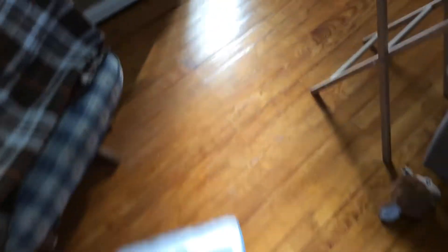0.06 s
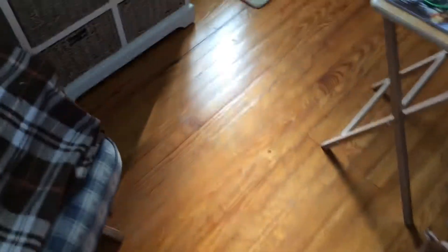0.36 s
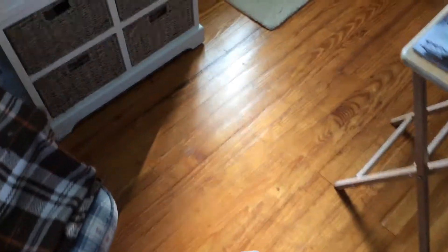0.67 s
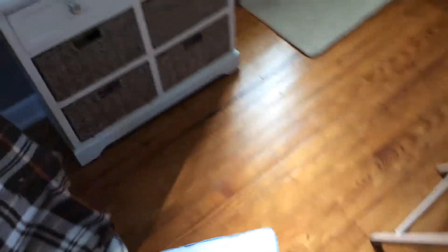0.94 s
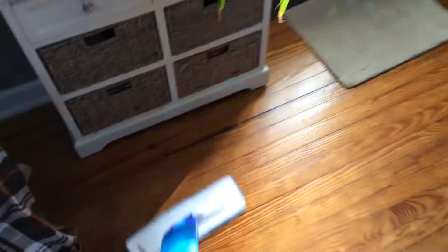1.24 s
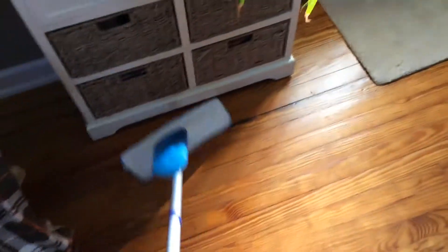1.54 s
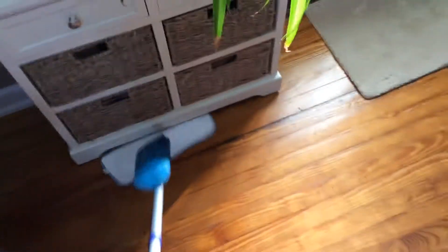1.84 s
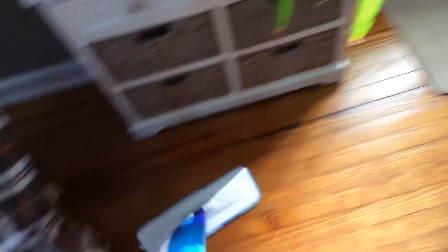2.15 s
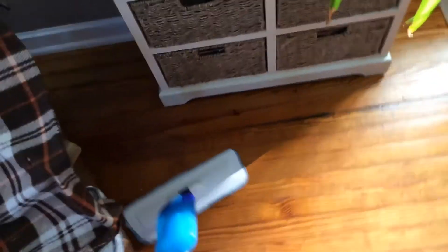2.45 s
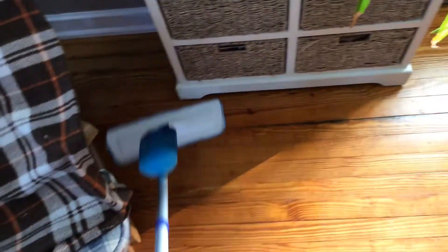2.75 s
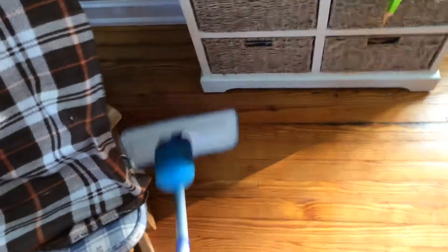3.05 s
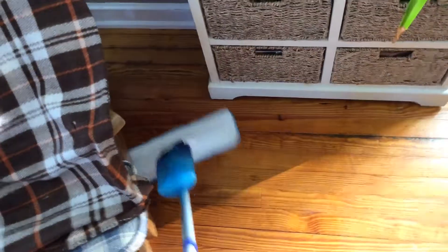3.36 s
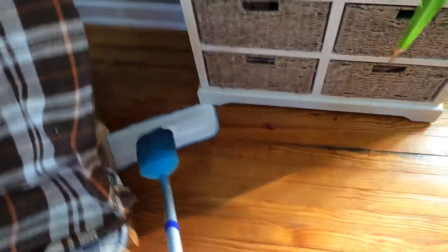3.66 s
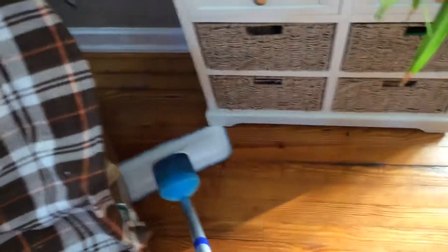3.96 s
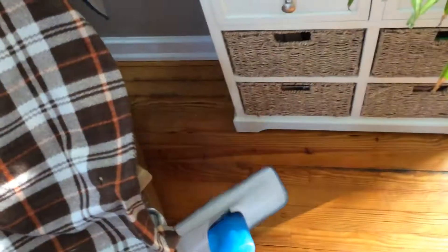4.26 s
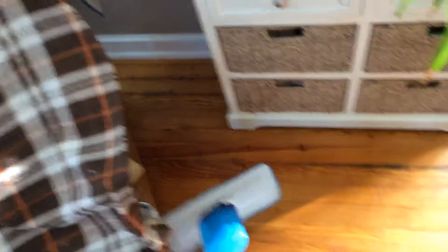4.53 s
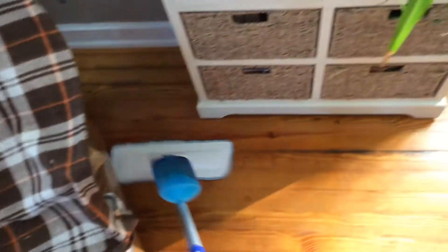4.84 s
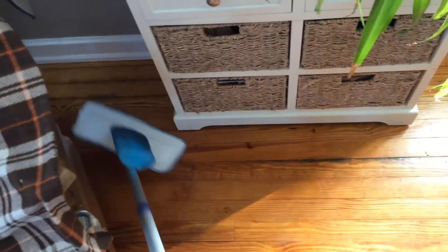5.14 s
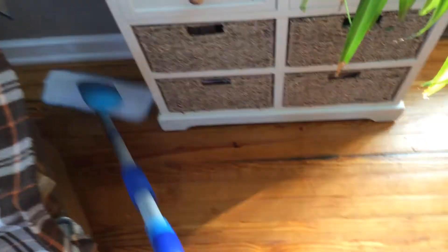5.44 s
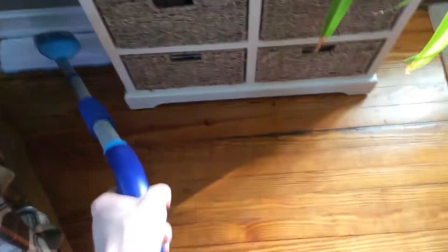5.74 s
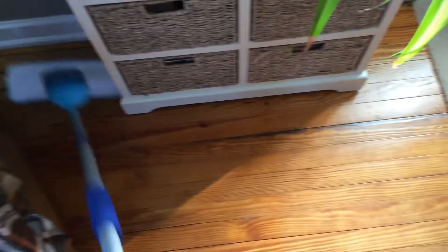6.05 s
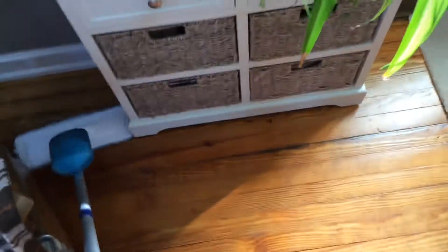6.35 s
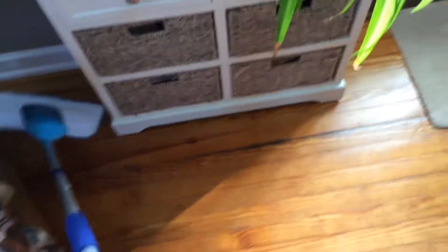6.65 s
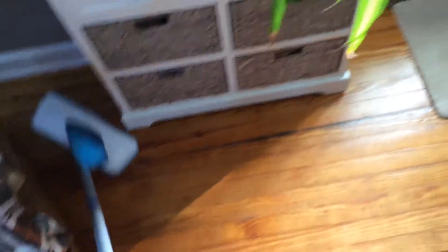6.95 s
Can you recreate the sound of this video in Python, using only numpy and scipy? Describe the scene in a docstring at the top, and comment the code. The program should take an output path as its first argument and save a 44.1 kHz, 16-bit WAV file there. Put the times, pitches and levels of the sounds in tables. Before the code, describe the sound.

Light clicks from a mop's swivel joint and soft cloth swishes, with a hollow wooden thump and later a sharp plastic clack.

```python
"""A flat plastic mop is pushed over a wooden floor in a small furnished room.
Its cloth pad swishes faintly and its swivel joint clicks. The head thuds softly on the floor, then at
1.7 s thumps a cabinet, whose panels boom while the joint rattles. The pad scuffs and the head's hard
edge clacks against furniture, loudest at 3.5 s. Clicks and tiny creaks of slipping parts lead to another
floor thud and rattle at 6.2 s. A low room rumble with a faint hiss and hum lies under it all."""
import sys
import numpy as np
from scipy import signal
from scipy.fft import rfft, irfft, next_fast_len
from scipy.io import wavfile
from scipy.ndimage import map_coordinates

SR = 44100
rng = np.random.default_rng(int(sys.argv[2]) if len(sys.argv) > 2 else 0)


def materialize(psi):
    """Save the field psi as 16-bit PCM at rate SR to the path in sys.argv[1].

    A 1-D psi becomes a single channel; in a 2-D psi each row is a channel.
    """
    bounded = np.clip(np.atleast_2d(psi).T, -1, 1)
    quanta = np.round(bounded * 32767).astype(np.int16)
    wavfile.write(sys.argv[1], SR, quanta)


N = 308700  # 7 s
HIT_TIME = np.arange(SR // 2) / SR  # time axis of one hit [s]
HIT_HZ = np.fft.rfftfreq(2 * len(HIT_TIME), 1 / SR)  # frequency axis of its EQ curves
LEAD_S, TICK_S = 0.03, 0.0021  # lead-in before each blow; contact time of a small part

# the head hits wood: (time [s], level [dB], crack send [dB], low boost [dB], ring send [dB], contact [s])
BUMP_CUES = [(1.22, -43.5, -17.5, 13.5, -17, 0.017), (1.736, -8, -13.5, -8, -3, 0.011),
             (1.795, -24, -20, 3, -8.5, 0.0093), (6.193, -34, -18.5, 10.5, -9.5, 0.0099)]
# the cabinet's panel modes: (frequency [Hz], level [dB], decay by 60 dB [s])
CABINET_MODES = [(78.2, -20, 0.26), (131, -9.5, 0.17), (167, -10.5, 0.19), (206, 1.5, .19),
                 (245.4, -12.5, 0.11), (322, -6, 0.29), (367, -4, 0.19), (415, -2.5, 0.19),
                 (558.4, -13.5, 0.3), (568.5, -12, 0.2), (759, -17.5, .2)]
# the dull body of a bump: (frequency [Hz], level [dB])
THUD_EQ = [(25, -55), (50, -25.5), (78, -9), (100, -7.5), (130, -6.5), (195, 2.5), (270, -1), (360, -2.5),
           (440, -6), (600, -11.5), (900, -27), (1300, -22.5), (2600, -66.5)]
# the attack at the head's edge: (frequency [Hz], level [dB])
CRACK_EQ = [(410, -10), (700, -4), (1030, -0.5), (1170, -9), (1440, -6.5), (1550, -7), (1720, -9.5),
            (8110, -25), (15000, -43)]


def wood_bumps(ring_db=-3, thud_db=-8, crack_db=-1, boost_hz=130, swell_cycles=1.2):
    """The mop head thuds on the floor or against the cabinet: its edge cracks and the wood booms."""
    out = np.zeros(N)
    for start, db, edge_db, low_db, panel_db, contact_s in BUMP_CUES:
        ring = np.zeros(len(HIT_TIME))
        for hz, mode_db, t60 in CABINET_MODES:
            swell = 1 - np.exp(-HIT_TIME * hz / swell_cycles)  # low modes take longer
            ring += swell * ringing_mode(hz, mode_db + rng.normal(0, 1), t60)
        weight = eq_curve(THUD_EQ) * (1 + amp(low_db) * low_pass(boost_hz))
        body_blow = contact(contact_s, room_db=1, rise_s=0.00031, scrape_db=-48)
        edge_blow = contact(contact_s / 2, room_db=4, rise_s=0.00053, scrape_db=-35.5)
        thud = amp(thud_db) * apply_eq(body_blow, weight)
        crack = amp(crack_db + edge_db) * apply_eq(edge_blow, eq_curve(CRACK_EQ))
        add(out, start, amp(db + ring_db + panel_db) * ring)
        add(out, start - LEAD_S, amp(db) * (thud + crack))
    return out


# the hard edge strikes: (time [s], level [dB], treble [dB], bass [dB], room send [dB], contact [s])
CLACK_CUES = [(2.9172, -32, -33.5, -6.5, -8, 0.0035), (2.925, -37, -21, 6, -3, 0.0027),
              (3.488, -47, -18.5, -7.5, -3, 0.004), (3.499, -12, -10.5, -10.5, -1, 0.0044),
              (3.711, -45, -10.5, 1.5, -3.5, 0.0026), (4.193, -36, -19, -9, -9.5, 0.0026)]
# the broad tone of the plastic plate: (frequency [Hz], level [dB])
PLATE_EQ = [(53, -53), (90, -23), (151, -9), (187, 2), (237, -6), (321, -5), (527, -8), (1120, -6),
            (1720, -11.5), (1920, -18.5), (2770, -14), (3360, -17), (8480, -24), (11700, -31.5),
            (15500, -54.5)]
# resonances of the head and its pole: (frequency [Hz], width [Hz], level [dB])
HEAD_PEAKS = [(315, 31, 9.5), (550, 60, 1.5), (760, 48, -1.5), (938, 34, -0.5), (1110, 60, -3),
              (1260, 26, -3.5), (1440, 50, -9), (1682, 150, -12), (2800, 85, -12.5), (3256, 88, -16),
              (3640, 20, -19.5), (3950, 170, -12), (5270, 26, -21)]


def head_clacks(ring_db=-5, treble_db=11, bass_db=3, treble_hz=2500, bass_hz=450):
    """The plastic plate and the pole ring briefly; each blow has its own treble and bass shelf."""
    out = np.zeros(N)
    body = eq_curve(PLATE_EQ) + amp(ring_db) * resonances(HEAD_PEAKS)
    highs = 1 / (1 + (treble_hz / (HIT_HZ + 1)) ** 4)
    lows = low_pass(bass_hz)
    for start, db, bright_db, weight_db, room_db, contact_s in CLACK_CUES:
        shelves = amp(highs * (bright_db + treble_db) + lows * (weight_db + bass_db))
        blow = contact(contact_s, room_db, rise_s=0.00037, scrape_db=-47.5, scrape_s=0.004)
        add(out, start - LEAD_S, amp(db) * apply_eq(blow, body * shelves))
    return out


# the swivel takes up its play: (time [s], level [dB], pitch [Hz], snap [dB], hollow [dB], chatter [s])
CLICK_CUES = [(0.5554, -47, 2200, -32, -0.5, 0.0018), (0.8953, -55, 4770, -17, -6, .002),
              (1.2462, -52, 4500, -11, -4, .003), (1.511, -50, 5200, -10.5, -6, 0.0034),
              (1.6032, -36.5, 3400, -4.5, -17, .003), (1.6116, -34.5, 7800, -35, -18, 0.0039),
              (1.796, -28, 1870, -3, -5.5, .002), (1.8115, -26, 6060, 4, -17, 0.0033),
              (1.8237, -33, 6540, 3.5, -15, 0.029), (1.9001, -31.5, 4630, 6.5, -9, 0.011),
              (2.1101, -42.5, 5660, -7.5, -16, 0.0044), (2.2793, -49, 2790, -28, -9.5, 0.0078),
              (2.5862, -47.5, 3090, -23, -3.5, 0.0019), (2.7409, -26.5, 7540, -9, -42, .006),
              (2.9369, -48.5, 2320, 1.5, -14, .004), (3.001, -38.5, 2400, -16, -17, 0.012),
              (3.0092, -36, 6600, -8, -14, 0.0032), (3.2679, -43.5, 3400, -35, -11.5, 0.0094),
              (3.311, -54, 3350, -30, -8, .004), (3.7194, -41.5, 7000, 1.5, -7.5, 0.014),
              (3.8, -48, 3230, -1, -15.5, 0.017), (4.064, -56, 2000, -32.5, -2, .015),
              (4.4553, -50, 3800, -9, -24, .002), (4.576, -42.5, 2620, -24, -6, 0.0095),
              (4.585, -40.5, 4450, -2.5, -10.5, 0.018), (5.3433, -49, 3100, -26, -9, 0.0014),
              (5.7377, -43.5, 3250, -25.5, -19, 0.0023), (5.7523, -35, 3380, -8, -16, .004),
              (5.8082, -45.5, 4810, -6.5, -11, 0.0035), (5.8562, -46, 3910, 2.5, -35.5, 0.0037),
              (6.1927, -31, 4600, -2.5, -7.5, 0.017), (6.2282, -35, 2290, -14, -7, 0.0028),
              (6.2479, -28.5, 8040, 1.5, -15, 0.0045), (6.266, -32, 7760, 1.5, -5.5, .004),
              (6.6437, -55.5, 3300, -38.5, -23.5, .004), (6.9221, -46, 10800, 6.5, -17, 0.0041)]
# the tick of small hard parts, also used for grit: (frequency [Hz], level [dB])
TICK_EQ = [(530, -25), (900, -2.5), (1520, -6), (1980, 2.5), (3340, -2), (4180, 0), (4600, -2), (6050, -1),
           (7410, -3), (11000, -13.5), (15500, -24)]
# the bright snap on top: (frequency [Hz], level [dB])
SNAP_EQ = [(5000, -29.5), (8500, -3.5), (9500, -1), (10100, 2.5), (11200, 0.5), (12800, -11.5),
           (15500, -16.5)]
# the hollow body underneath: (frequency [Hz], level [dB])
HOLLOW_EQ = [(150, -32.5), (500, 2), (1000, 11.5), (1600, 14), (2600, -19.5)]
# modes of the thin metal pole: (frequency [Hz], level [dB], decay by 60 dB [s])
POLE_MODES = [(7900, -3, .3), (9500, -7, .25), (14150, -1, 0.25), (15400, -9, .2)]


def swivel_clicks(snap_db=1, body_db=1, housing_db=-5, note_db=-4, pole_db=-25, firm_db=-31):
    """Small plastic parts meet and chatter: a pitched tick, a bright snap and a faint ping of the pole."""
    out = np.zeros(N)
    for start, db, hz, bright_db, hollow_db, chatter_s in CLICK_CUES:
        note = resonances([(hz, 0.32 * hz, 0)])
        tick = unit(eq_curve(TICK_EQ) + amp(housing_db) * housing() + amp(note_db) * note)
        snap = amp(bright_db + snap_db) * eq_curve(SNAP_EQ)
        hollow = amp(hollow_db + body_db) * eq_curve(HOLLOW_EQ)
        tone = np.sqrt(tick ** 2 + snap ** 2 + hollow ** 2)
        blow = contact(TICK_S, room_db=-2, rise_s=0.0007, scrape_db=-17.5, scrape_s=0.007)
        rattle = signal.fftconvolve(blow, chatter(chatter_s))
        add(out, start - LEAD_S, amp(db) * apply_eq(rattle, tone))
        ping = sum(ringing_mode(*mode) for mode in POLE_MODES)
        # only firm clicks shake the pole; the light parts that snap brightly hardly do
        firmness = min(amp(db - firm_db), 1) / (1 + amp(bright_db + 9))
        add(out, start, amp(db + pole_db) * firmness * ping)
    return out


def chatter(decay_s, ticks_per_s=330, tick_db=-5):
    """Loose parts make one firm contact, then uneven smaller ones that die away."""
    t = HIT_TIME[:len(HIT_TIME) // 3]
    hits = rng.random(len(t)) < ticks_per_s / SR
    ticks = hits * rng.standard_normal(len(t)) * amp(tick_db) * np.exp(-t / decay_s)
    ticks[0] = 1
    return ticks


# resonances of the joint's plastic housing: (frequency [Hz], width [Hz], level [dB])
HOUSING_PEAKS = [(1976, 310, -9), (2676, 320, -10), (3570, 520, 4.5), (5030, 430, -7), (5367, 500, 2),
                 (8000, 740, -3.5)]


def housing(detune=0.068, spread_db=3):
    """Each point of contact shifts the housing's resonances and favours some of them."""
    return resonances([(hz * np.exp(rng.normal(0, detune)), width, db + rng.normal(0, spread_db))
                       for hz, width, db in HOUSING_PEAKS])


# a tight joint or the pad slips: (time [s], level [dB], pitch [Hz], rasp [dB], decay [s])
CREAK_CUES = [(0.712, -61, 820, -20, 0.023), (0.748, -60, 950, -5, 0.015), (4.471, -38.5, 3950, -1, 0.0018),
              (4.4844, -45.5, 3360, 4.5, 0.0029), (5.4207, -40.5, 4750, -3, 0.0021),
              (5.4278, -44.5, 5030, -2, 0.0031), (5.7068, -47, 5040, 6.5, 0.005),
              (5.811, -43, 4700, 2.5, 0.0032), (6.173, -46, 1920, 0.5, 0.0072),
              (6.180, -35.5, 1920, 0.5, 0.0035)]
# the rasp of a slip: (frequency [Hz], level [dB])
RASP_EQ = [(400, 7.5), (1800, 8.5), (3300, 6), (5500, -26), (7500, -10), (15000, -12.5)]


def creaks(level_db=-2, width_share=0.12):
    """A slip sings for a few milliseconds and rasps in the housing."""
    out = np.zeros(N)
    for start, db, hz, rasp_db, decay_s in CREAK_CUES:
        note = resonances([(hz, width_share * hz, 0)])
        rasp = amp(rasp_db) * unit(eq_curve(RASP_EQ) + housing())
        slip = contact(decay_s, room_db=-4, rise_s=0.0011, scrape_db=-12.5)
        add(out, start - LEAD_S, amp(db + level_db) * apply_eq(slip, note + rasp))
    return out


# the airy swish of cloth: (frequency [Hz], level [dB])
CLOTH_EQ = [(710, -15), (1200, -1), (1540, -5), (1780, -4), (2410, -6), (3140, -1), (3730, -0.5),
            (4770, -4), (9270, -4), (15500, -20.5)]
# the darker rub of the floorboards: (frequency [Hz], level [dB])
BOARDS_EQ = [(200, -14), (500, -0.5), (850, 0.5), (1400, -5.5), (2500, -10.5), (4500, -28)]


def pad_swish(grain_db=1.5, pressure_db=1, grit_db=-9, grit_per_s=14):
    """Cloth fibres catch on the boards as the pad slides under an uneven hand; grit ticks beneath it."""
    swish, rub = pad_envelopes() * amp(pressure_db * wobble(14))
    fibres = unit(noise_bed(CLOTH_EQ) * amp(grain_db * wobble(200)))
    boards = unit(noise_bed(BOARDS_EQ) * amp(grain_db * wobble(60)))
    specks = (rng.random(N) < grit_per_s / SR) * rng.random(N)
    tick = apply_eq(contact(TICK_S, room_db=-3), eq_curve(TICK_EQ))
    grit = unit(signal.fftconvolve(specks, tick)[:N])
    return swish * (fibres + amp(grit_db) * grit) + rub * boards


# pushes and pulls of the pad: (start [s], length [s], swish [dB], rub [dB])
STROKE_CUES = [(0.323, 1.8, -73, -69), (2.077, 0.34, -77.5, -69.5), (2.416, 0.5, -70, -67),
               (3.1, 0.24, -71.5, -68), (3.386, 0.48, -67, -67.5), (4.101, 0.43, -74.5, -71.5),
               (4.54, 0.6, -71, -74), (4.901, 0.79, -73, -73), (5.952, 0.13, -74.5, -67.5),
               (6.417, 0.22, -71.5, -76.5)]
# the pad catches and scuffs: (peak time [s], swish [dB], rub [dB])
SCUFF_CUES = [(0.132, -69.5, -62), (0.745, -79, -65), (1.59, -72, -66.5), (2.73, -55, -68.5),
              (4.184, -65.5, -63.5), (4.33, -72, -73), (5.71, -71, -64.5), (6.905, -69.5, -70.5)]


def pad_envelopes(speed_up_s=0.13, slow_down_s=0.14, attack_s=0.034, release_s=0.045):
    """Gains of swish and rub: a stroke speeds up, glides and slows down; a scuff swells and lets go."""
    t = np.arange(N) / SR
    power = np.zeros((2, N))
    for start, length, *levels_db in STROKE_CUES:
        speed = np.clip(np.minimum((t - start) / speed_up_s, (start + length - t) / slow_down_s), 0, 1)
        power += np.outer(amp(levels_db) ** 2, speed)
    for peak, *levels_db in SCUFF_CUES:
        from_peak = np.maximum((peak - t) / attack_s, (t - peak) / release_s)
        grip = np.exp(-np.minimum(from_peak, 10) ** 2)
        power += np.outer(amp(levels_db) ** 2, grip)
    return np.sqrt(power)


# the furnished room's short reverb: (frequency [Hz], decay by 60 dB [s])
ROOM_DECAY = [(100, 0.27), (400, 0.26), (1100, 0.26), (2500, 0.23), (11000, 0.22), (15000, 0.12)]


def contact(decay_s, room_db, rise_s=0.001, scrape_db=-25, scrape_s=0.0064):
    """The raw transient of every hit: parts scrape, meet at LEAD_S, and the room answers."""
    t = HIT_TIME - LEAD_S
    after, before = np.maximum(t, 0), np.maximum(-t, 0)
    blow = np.exp(-after / decay_s) * (1 + np.tanh(t / rise_s - 1)) / 2
    envelope = blow + amp(scrape_db) * np.exp(-before / scrape_s) * (t < 0)
    # a hard contact feeds all frequencies alike: keep only the burst's phases
    phases = np.angle(rfft(rng.standard_normal(len(t)) * envelope))
    burst = irfft(np.exp(1j * phases), len(t)) * np.where(t < 0, envelope, envelope ** 0.11)
    hz, frame_times, bands = signal.stft(rng.standard_normal(len(t)), SR, nperseg=256)
    decay_db = -60 * np.maximum(frame_times - LEAD_S, 0) / along(ROOM_DECAY, hz)[:, None]
    tail = signal.istft(bands * amp(decay_db), SR, nperseg=256)[1][:len(t)]
    tail *= 1 - np.exp(-after / 0.0018)  # the reverb fades in after the blow
    return (unit(burst) + amp(room_db) * unit(tail)) * np.sqrt(np.mean(envelope ** 2))


# the low rumble of the house: (frequency [Hz], level [dB])
RUMBLE_EQ = [(12, -36.5), (20, -13), (53, 6.5), (83, 5.5), (362, -5.5), (452, -5.5), (505, -4.5),
             (565, -17), (788, -14.5), (2610, -30.5), (5530, -25.5), (6910, -31.5), (9130, -24.5),
             (12400, -30.5), (15500, -51)]
# steady air noise: (frequency [Hz], level [dB])
HISS_EQ = [(300, -6.5), (850, 5.5), (1500, 1), (3500, -2), (9300, -3.5), (15500, -20.5)]


def room_tone(rumble_db=-65, waver_db=1, hiss_db=-74, hum_hz=507, hum_db=-83, drift_rad=0.5):
    """The low, slightly restless rumble of the house, with a soft hiss and a faint hum."""
    hum = np.sqrt(2) * np.sin(2 * np.pi * hum_hz * np.arange(N) / SR + drift_rad * wobble(6))
    rumble = amp(rumble_db + waver_db * wobble(3.5)) * noise_bed(RUMBLE_EQ)
    return rumble + amp(hiss_db) * noise_bed(HISS_EQ) + amp(hum_db) * hum


def noise_bed(eq):
    """Steady coloured noise of rms 1."""
    gain = amp(along(eq, np.fft.rfftfreq(N, 1 / SR)))
    return unit(irfft(rfft(rng.standard_normal(N)) * gain, N))


def wobble(rate):
    """A smooth random curve, rate knots a second."""
    knots = rng.standard_normal(int(N * rate / SR) + 4)
    return map_coordinates(knots, [np.arange(N) * rate / SR])


def ringing_mode(hz, db, t60):
    """A sine of random phase that falls 60 dB in t60 seconds."""
    return amp(db - 60 * HIT_TIME / t60) * np.sin(2 * np.pi * (hz * HIT_TIME + rng.random()))


def resonances(peaks):
    """A gain curve of (Hz, width, dB) humps that keeps the power of white noise."""
    return unit(sum(amp(db) / (1 + (2 * (HIT_HZ - hz) / width) ** 2) for hz, width, db in peaks))


def eq_curve(points):
    """A gain curve through (Hz, dB) points, scaled to keep the power of white noise."""
    return unit(amp(along(points, HIT_HZ)))


def low_pass(corner_hz):
    """A gain curve that falls 24 dB an octave above the corner."""
    return 1 / (1 + (HIT_HZ / corner_hz) ** 4)


def apply_eq(x, gain):
    """Filter x with this gain curve at minimum phase, so nothing rings ahead of the attack."""
    size = len(HIT_TIME)
    cepstrum = irfft(np.log(np.maximum(gain, 1e-6)))
    cepstrum[1:size] *= 2
    cepstrum[size + 1:] = 0
    return irfft(rfft(x, len(cepstrum)) * np.exp(rfft(cepstrum)))[:size]


def along(points, hz):
    """(Hz, value) points read on a log axis."""
    point_hz, values = np.transpose(points)
    return np.interp(np.log(hz + 1), np.log(point_hz + 1), values)


def add(track, start, x):
    """Mix x into the track from start seconds on."""
    part = track[round(start * SR):][:len(x)]
    part += x[:len(part)]


def amp(db):
    """Decibels to gain."""
    return 10 ** (np.asarray(db) / 20)


def unit(x):
    """Scaled to rms 1."""
    return x / np.sqrt(np.mean(np.abs(x) ** 2) + 1e-20)


def scene():
    """The mop at work in the quiet room, in mono."""
    return (wood_bumps() + head_clacks() + swivel_clicks() + creaks() + pad_swish() + room_tone())[None]


def record(dry, top_hz=15900):
    """A brick-wall high cut on the whole mix."""
    size = next_fast_len(N + SR // 2)
    passband = np.fft.rfftfreq(size, 1 / SR) < top_hz
    return irfft(rfft(dry, size) * passband, size)[:, :N]


dry = scene()
out = record(dry)
materialize(out)
```